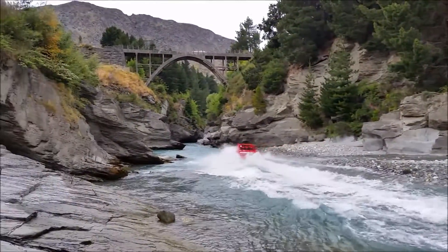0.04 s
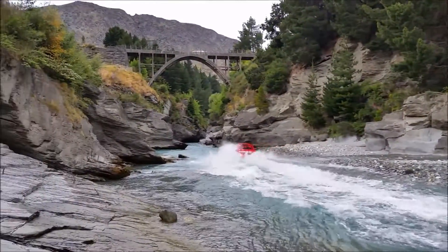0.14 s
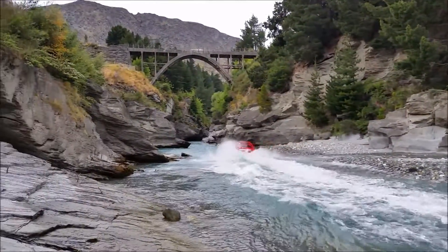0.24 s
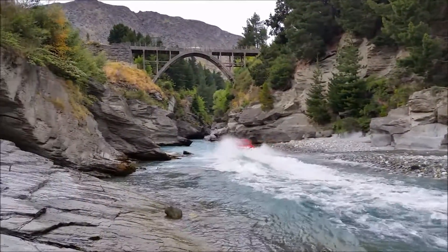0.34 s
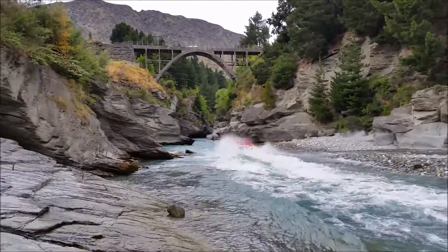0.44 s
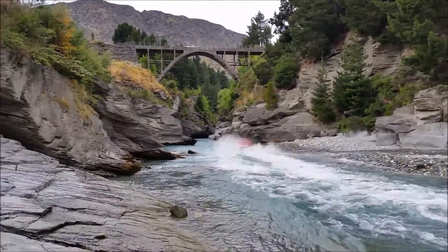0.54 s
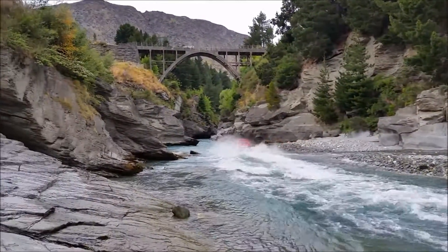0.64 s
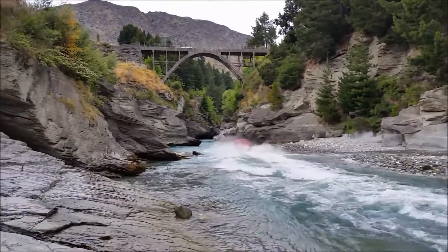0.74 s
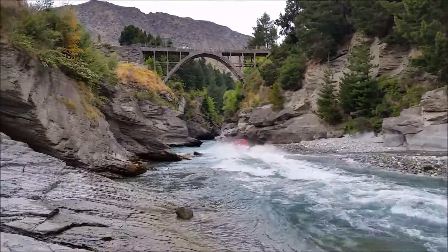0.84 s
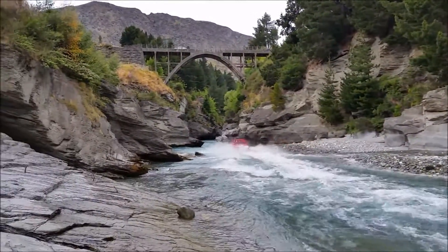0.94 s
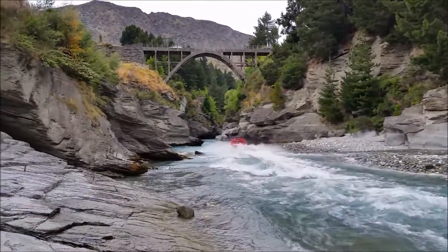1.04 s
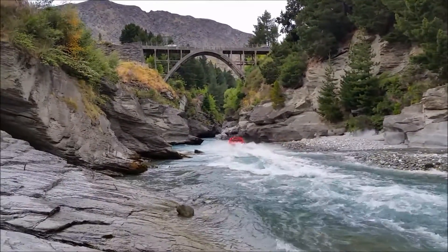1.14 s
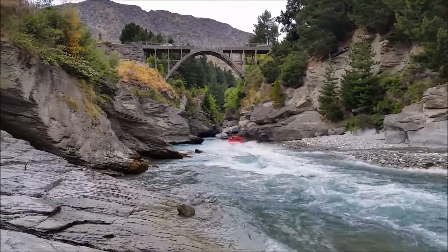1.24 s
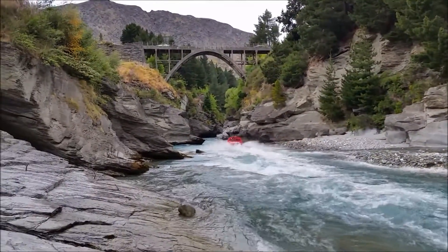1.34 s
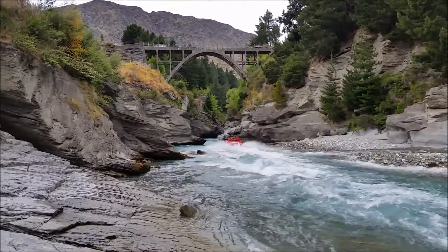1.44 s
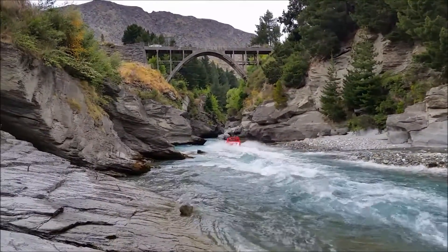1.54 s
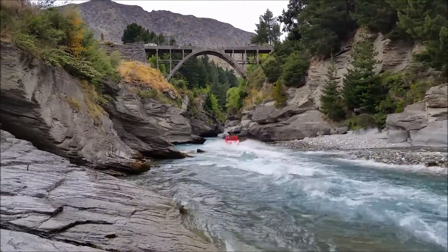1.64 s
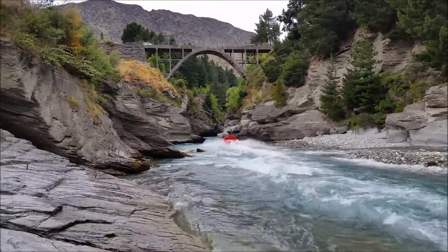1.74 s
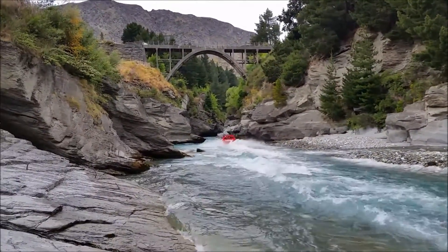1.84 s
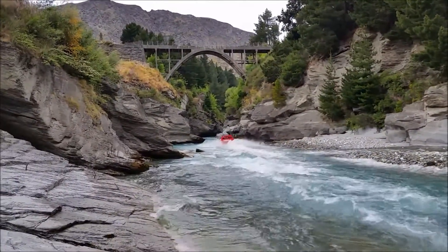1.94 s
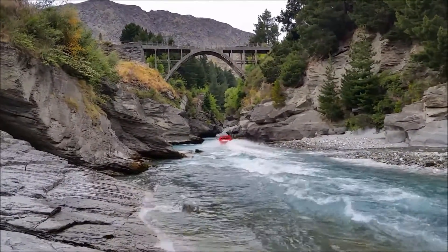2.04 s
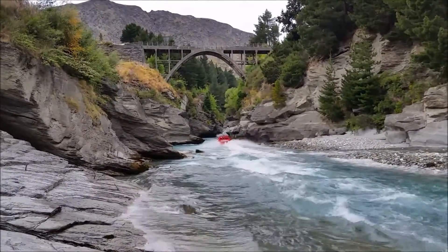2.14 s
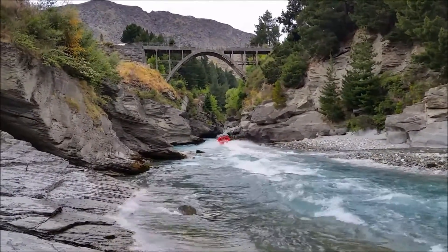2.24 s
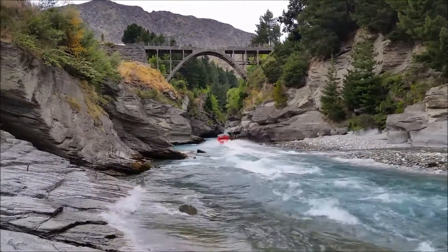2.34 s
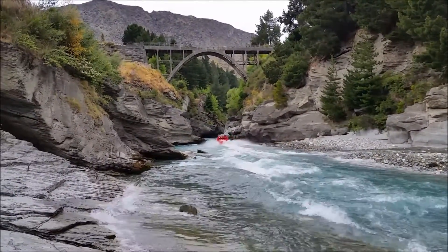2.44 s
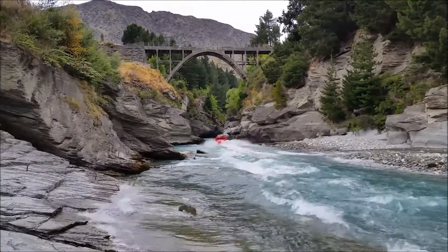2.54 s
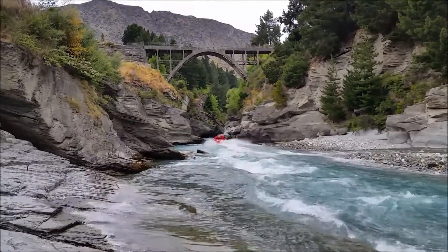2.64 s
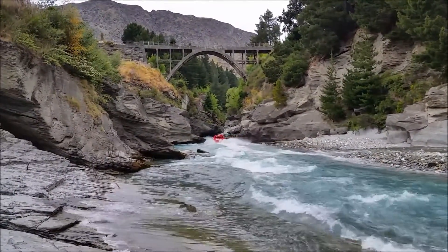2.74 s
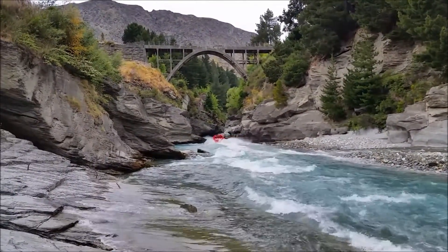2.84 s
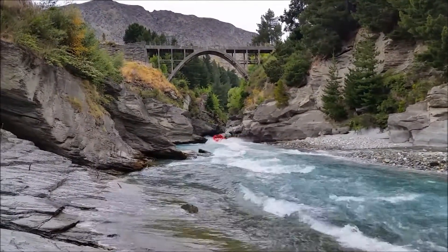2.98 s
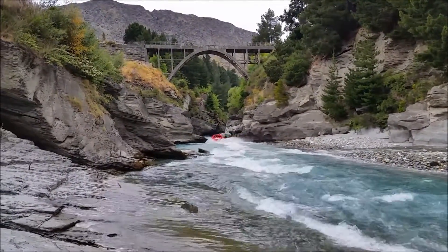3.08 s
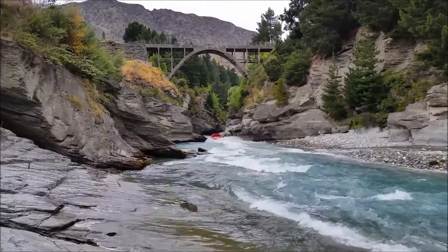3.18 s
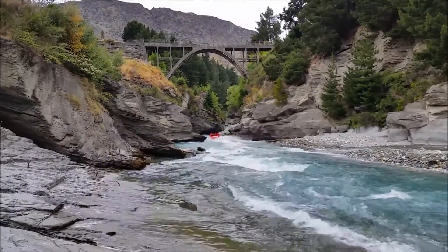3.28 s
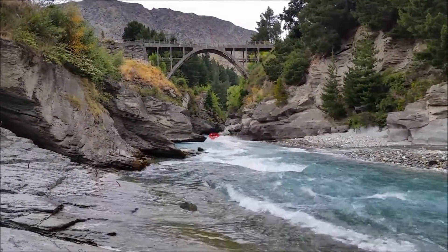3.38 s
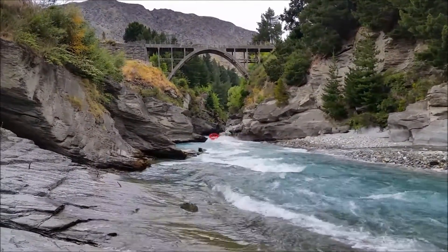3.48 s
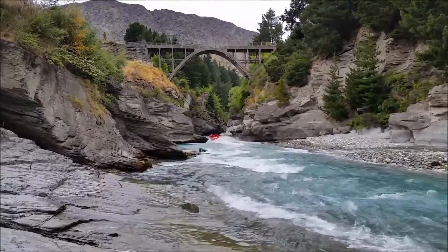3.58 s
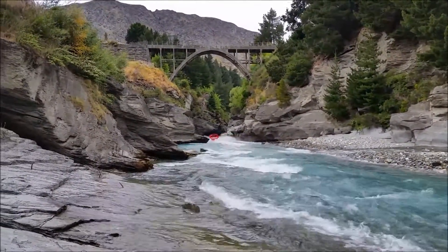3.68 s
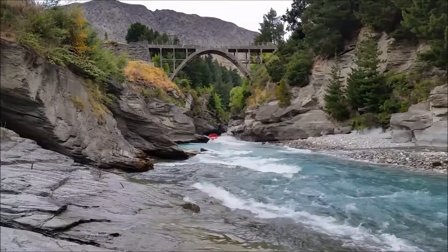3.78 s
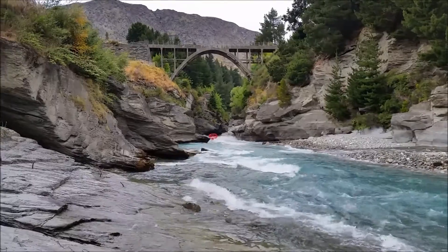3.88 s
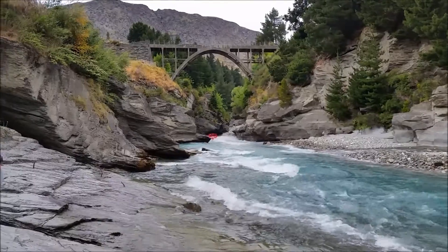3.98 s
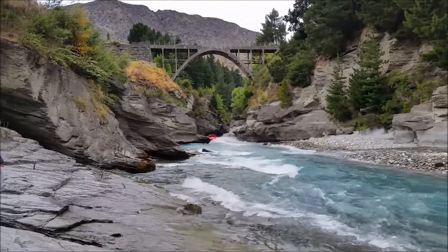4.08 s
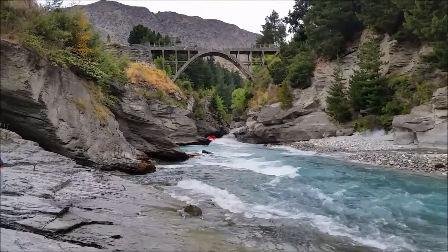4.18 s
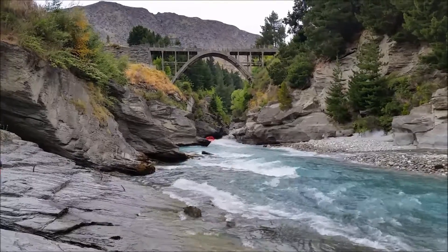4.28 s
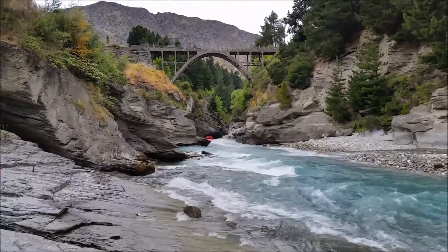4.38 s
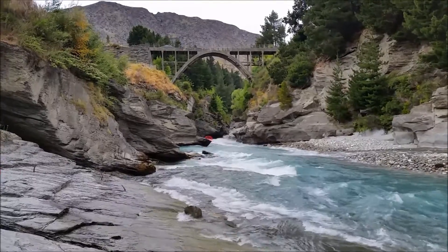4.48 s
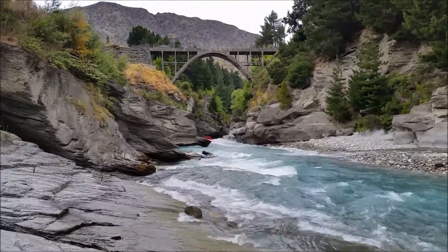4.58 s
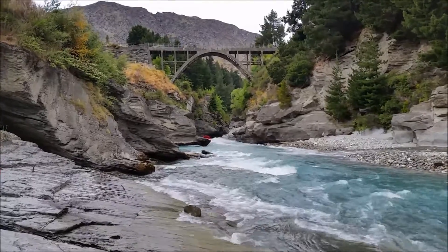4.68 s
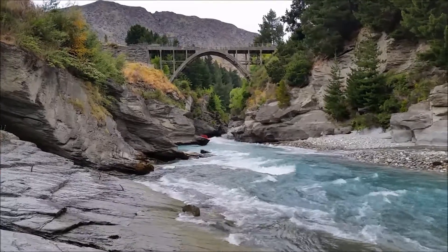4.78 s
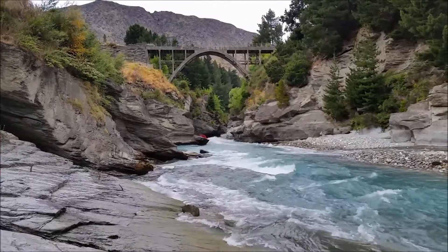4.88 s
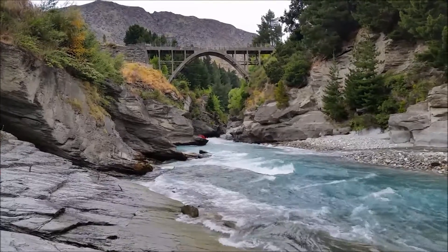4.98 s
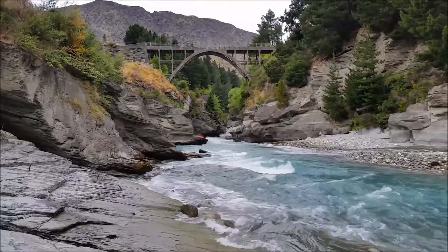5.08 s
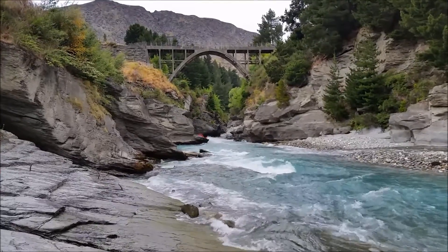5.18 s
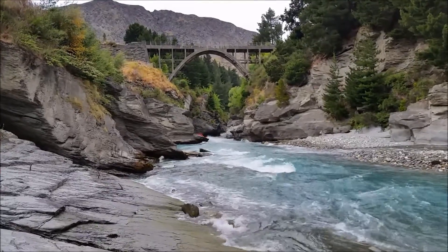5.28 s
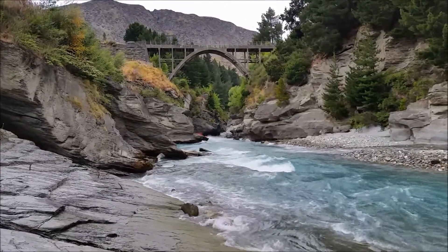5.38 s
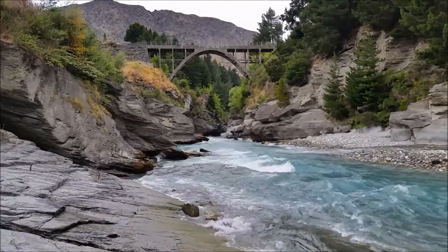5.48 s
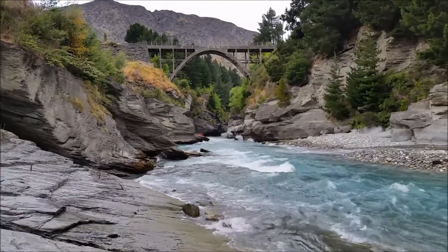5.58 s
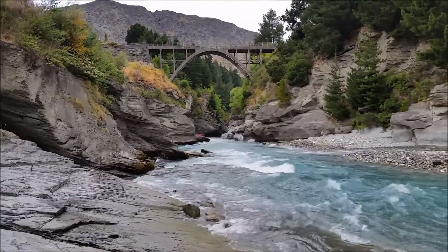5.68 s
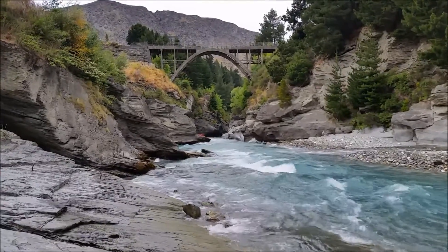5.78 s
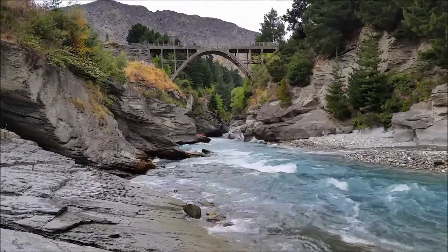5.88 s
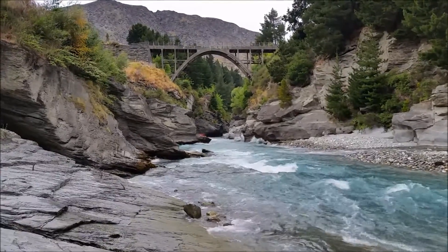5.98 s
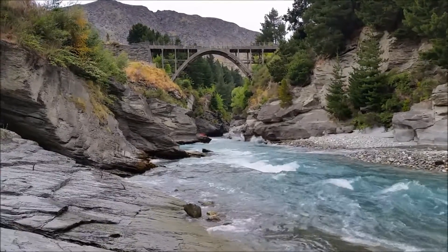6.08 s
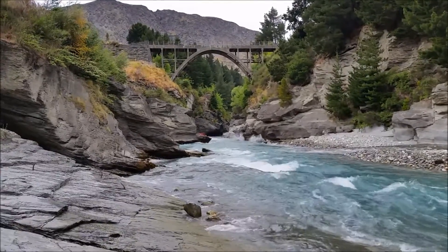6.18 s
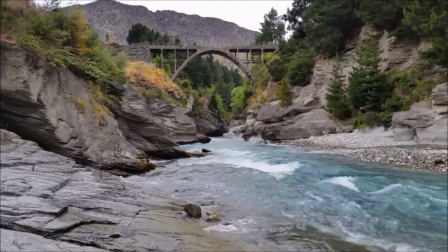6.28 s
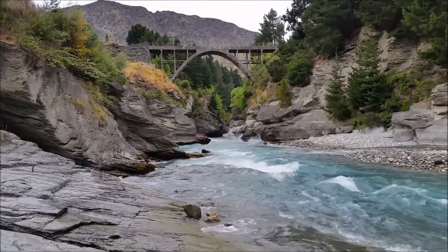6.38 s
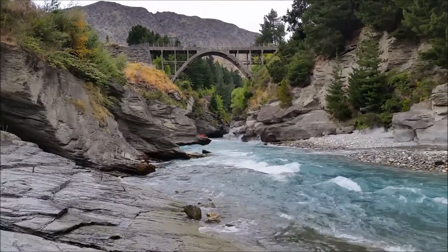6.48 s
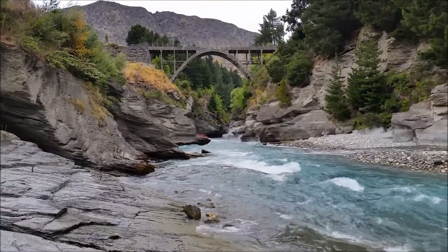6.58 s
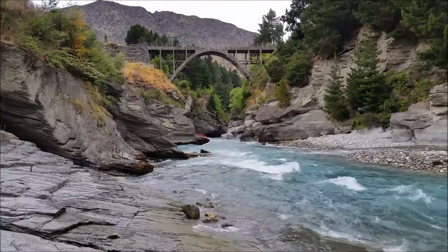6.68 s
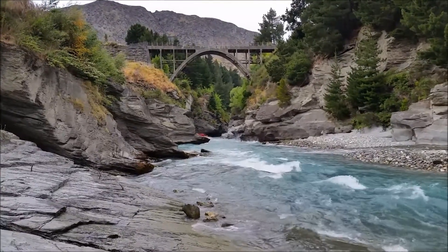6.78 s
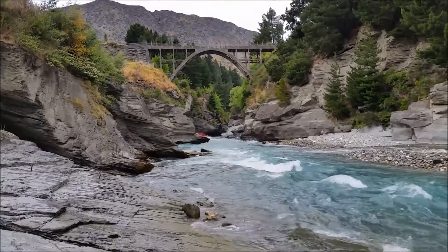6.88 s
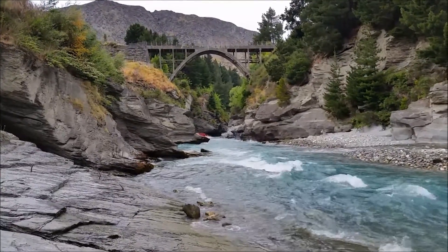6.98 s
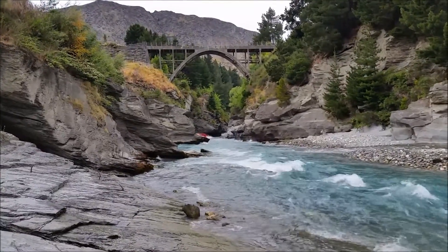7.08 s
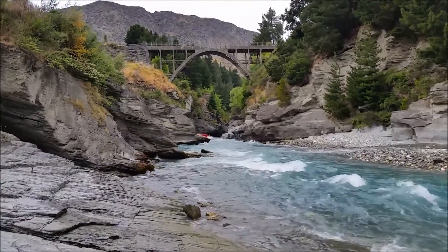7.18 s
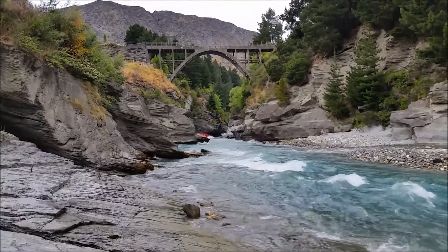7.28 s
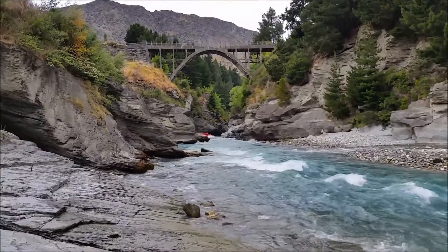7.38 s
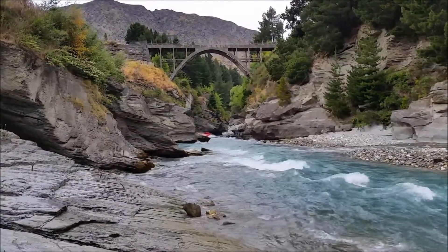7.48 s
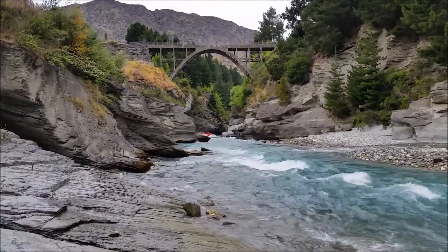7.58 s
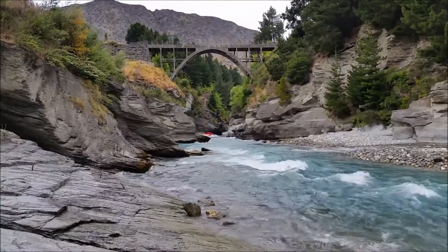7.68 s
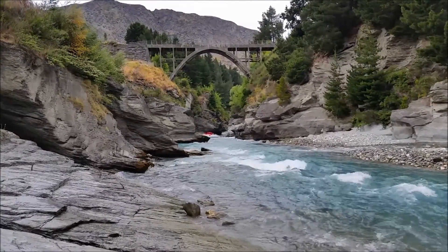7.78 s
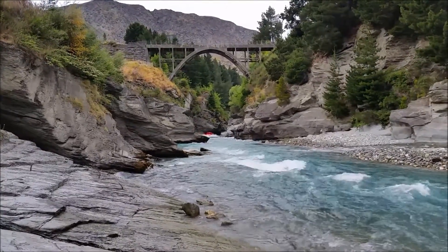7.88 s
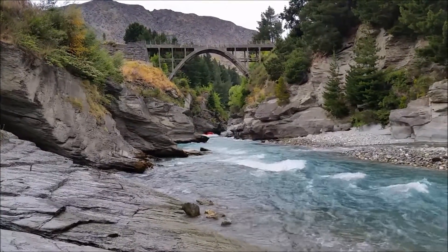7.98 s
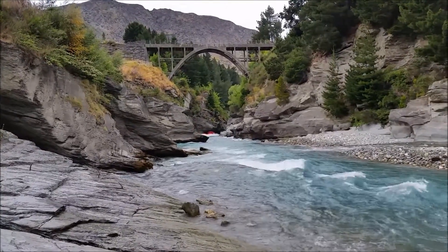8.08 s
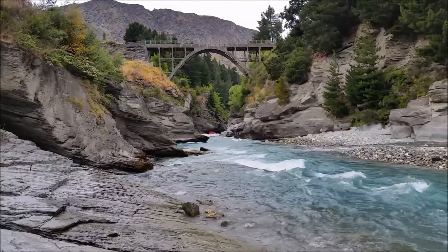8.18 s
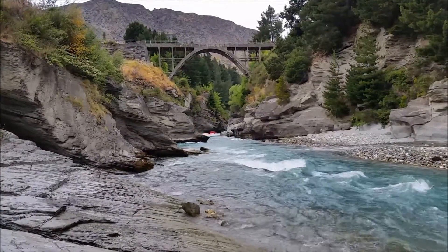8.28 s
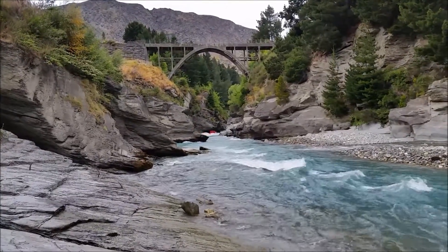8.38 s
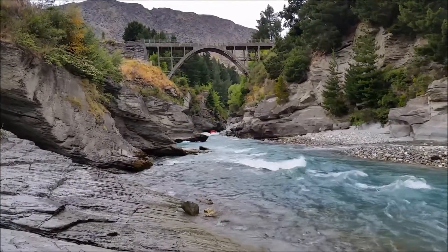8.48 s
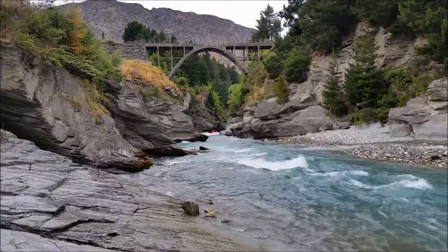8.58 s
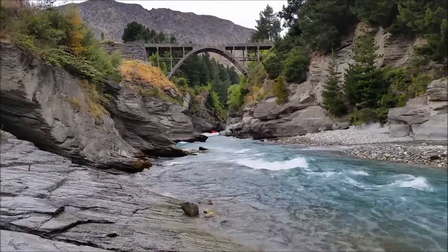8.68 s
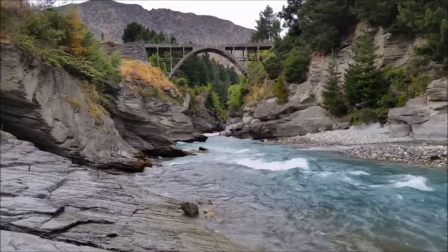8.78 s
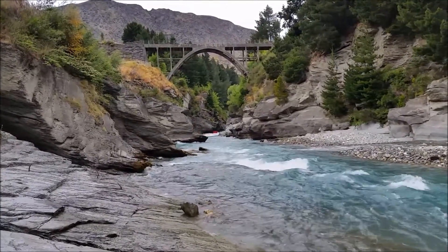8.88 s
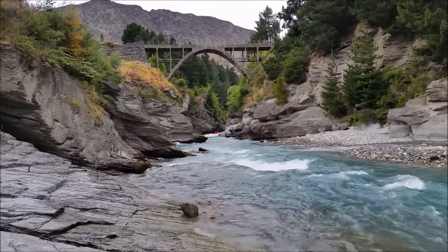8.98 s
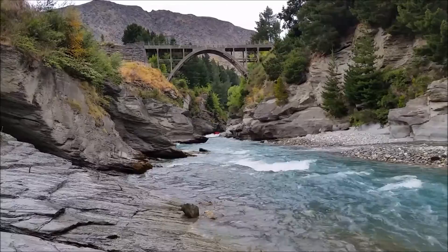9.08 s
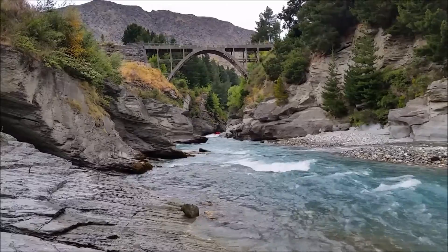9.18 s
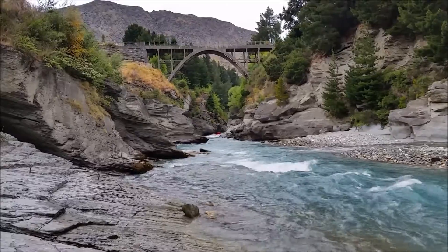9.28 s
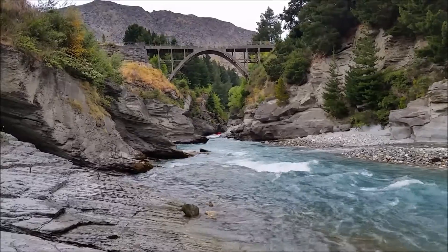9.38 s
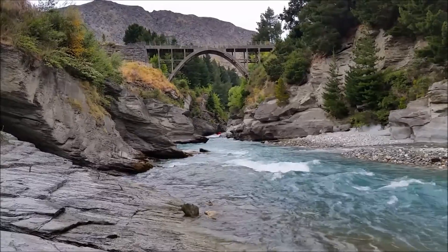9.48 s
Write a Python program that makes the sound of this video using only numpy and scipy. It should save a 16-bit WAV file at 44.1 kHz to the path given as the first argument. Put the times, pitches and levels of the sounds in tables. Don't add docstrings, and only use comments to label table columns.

```python
import sys
import numpy as np
from scipy import signal
from scipy.fft import rfft, irfft, next_fast_len
from scipy.io import wavfile
from scipy.ndimage import uniform_filter1d

SR = 44100
rng = np.random.default_rng(int(sys.argv[2]) if len(sys.argv) > 2 else 0)


def magnitude_from_level(level_db):
    exponent = np.asarray(level_db, float) / 20
    return 10 ** exponent


def store_wav(level_fs):
    pcm = np.round(np.clip(np.atleast_2d(level_fs), -1, 1) * 32767)
    wavfile.write(sys.argv[1], SR, pcm.T.astype(np.int16))


N = 420273
TIME = np.arange(N) / SR
SIZE = next_fast_len(N)
FREQ = np.maximum(np.arange(SIZE // 2 + 1) * SR / SIZE, 1)
STEP = 20
BASS_SR = SR / STEP
BASS_TIME = TIME[::STEP]


def unit(x):
    return x / np.sqrt(np.mean(np.abs(x) ** 2))


def columns(table, time):
    s, *rest = np.transpose(table)
    return [np.interp(time, s, column) for column in rest]


def over_hz(table, freq, count=1):
    rows = np.array(table)
    return np.interp(np.log(freq), np.log(rows[:, 0]), rows[:, count])


def coloured(x, table):
    length = x.shape[-1]
    freq = np.linspace(1, BASS_SR / 2, length // 2 + 1)
    return unit(irfft(rfft(x) * magnitude_from_level(over_hz(table, freq)), length))


def walk(rate, time, count=1):
    levels = rng.standard_normal((count, 4000))
    place = time * rate
    k = place.astype(int)
    ease = (1 - np.cos(np.pi * (place - k))) / 2
    return (levels[:, k] * (1 - ease) + levels[:, k + 1] * ease) * np.sqrt(4 / 3)


def swells(table):
    s, half, *rest = np.transpose(table)
    bumps = np.exp(-((BASS_TIME[:, None] - s) / half) ** 2)
    return bumps, *rest


def pair(likeness, lag):
    shared, left, right = rfft(rng.standard_normal((3, SIZE)))
    c = np.clip(likeness, 0, 1)
    common, own = np.sqrt(c) * shared, np.sqrt(1 - c)
    return np.array([common * np.exp(-1j * lag) + own * left, common + own * right])


# freq_hz, level_db
WIND_COLOUR = [(15, -18), (40, -12), (70, -2), (120, 0), (200, -4.5), (300, -13.5), (500, -20),
               (900, -36.5)]
# start_s (centre), half_length_s, level_db
GUSTS = [(.3, 0.19, -14), (.75, 0.052, -9.5), (1.0, 0.23, -10.5), (1.58, 0.14, -20.5), (2.02, 0.1, -12.5),
         (2.25, .08, -8.5), (2.45, 0.057, -12), (2.82, 0.16, -6.5), (3.05, .12, -10.5), (3.55, 0.39, -16),
         (3.8, .1, -26), (4.0, 0.16, -9.5), (4.62, 0.09, -21), (4.88, 0.067, -31), (5.5, 0.26, -53),
         (6.7, 0.061, -27), (7.07, .1, -15), (7.63, 0.063, -26), (7.88, 0.062, -32), (8.13, .08, -32),
         (8.62, 0.06, -22), (8.88, .08, -21), (9.16, 0.099, -19)]
CALM_DB, CALM_DB_PER_S = -19.5, -3


def wind():
    air = coloured(rng.standard_normal((2, len(BASS_TIME))), WIND_COLOUR)
    air = air * magnitude_from_level(2.0 * walk(25, BASS_TIME, count=2))
    bumps, gust_db = swells(GUSTS)
    strength = bumps @ magnitude_from_level(gust_db) + magnitude_from_level(CALM_DB + CALM_DB_PER_S * BASS_TIME)
    return air * strength * magnitude_from_level([[-4.], [-11.]])


# freq_hz, level_db (per Hz)
LEFT_PORT = [(100, -53), (300, -56.5), (700, -57.5), (1000, -59.5), (1850, -61.5), (2500, -71),
             (4400, -73.5), (5000, -79.5), (7700, -74.5), (9300, -64), (11500, -74), (15700, -78)]
RIGHT_PORT = [(100, -60), (300, -61), (650, -58), (900, -66.5), (1800, -67), (2900, -76.5), (6700, -79.5),
              (8500, -90), (12500, -78), (14000, -69), (15200, -63.5), (15700, -62)]
# freq_hz, likeness (0-1), left_lag_rad
PORTS = [(300, .4, -.25), (650, .75, -.1), (1000, .45, 1.), (1290, .3, 2.2), (1550, .45, 2.9),
         (1800, .1, 4.2), (2200, .45, 5.5), (2800, .1, 6)]
SPRAY_SHARE = [0, .5, .75, 1.3, .9]
# start_s (centre), half_length_s, rush_swell_db, spray_swell_db
WAVES = [(.05, 0.069, -1, 2.5), (.38, 0.058, 3.5, 1), (.62, 0.086, 1, -0.5), (.98, 0.22, 2, 5),
         (1.33, 0.2, 2, 3.5), (1.9, 0.35, 4.5, 5), (2.53, 0.22, 4, 4.5), (2.85, 0.15, 1, 3),
         (3.28, 0.2, 1.5, 2.5), (4.08, 0.26, 0.8, 4.5), (4.5, .2, 2, 2.5), (4.83, .12, 2, 2),
         (5.2, 0.24, 1.5, 3.5), (5.55, 0.26, 1.5, 2), (5.98, 0.45, 1.5, 3), (6.93, 0.22, 0.5, 3),
         (7.28, 0.15, 1, 2.5), (7.68, .2, 0.5, 2.5), (8.2, .2, -0.4, 1), (8.8, .12, -0.3, 0),
         (9.2, 0.22, 0, 2.5)]
RUSH_DB, RUSH_DB_PER_S, SPRAY_DB, SPRAY_DB_PER_S = -3., 0.2226, 0.48, -0.63


def river():
    bumps, rush_swell_db, spray_swell_db = swells(WAVES)
    rush_db = RUSH_DB + RUSH_DB_PER_S * BASS_TIME + bumps @ rush_swell_db
    spray_db = SPRAY_DB + SPRAY_DB_PER_S * BASS_TIME + bumps @ spray_swell_db
    ports_db = np.array([over_hz(LEFT_PORT, FREQ), over_hz(RIGHT_PORT, FREQ)])
    water = pair(over_hz(PORTS, FREQ), over_hz(PORTS, FREQ, count=2))
    water = water * magnitude_from_level(ports_db) * np.sqrt(SR / 2)
    surge = walk(13, BASS_TIME)[0]
    splash = walk(260, BASS_TIME, count=2)
    heave = walk(7, BASS_TIME)[0]
    centres = np.log2([500, 2200, 7500, 10700, 15000])
    out = 0
    for k, treble in enumerate(np.linspace(0, 1, len(centres))):
        band = np.interp(np.log2(FREQ), centres, np.arange(len(centres)) == k)
        db = rush_db + SPRAY_SHARE[k] * (spray_db - rush_db) - 1.
        db = db + 1.27 * treble ** 0.45 * surge + 0.17 * heave
        db = db + 0.53 * treble * walk(25, BASS_TIME, count=2)
        db = db + 2.0 * treble ** 3 * splash
        gain = np.repeat(magnitude_from_level(db), STEP, axis=1)[:, :N]
        gain = uniform_filter1d(gain, STEP)
        out = out + irfft(water * band, SIZE)[:, :N] * gain
    return out


# start_s, peak_db, pitch_hz
DROP = [
    (7.639, -32, 4610),
]


def drop():
    out = np.zeros(N)
    for s, db, hz in DROP:
        swell = np.exp(-((TIME - s - .003) / 0.0019) ** 2)
        out += magnitude_from_level(db) * swell * np.sin(2 * np.pi * hz * TIME)
    return out * magnitude_from_level([[3], [-4]])


# start_s, level_db
ROAR = [(0, -21.5), (.8, -17), (1.2, -21), (2, -18), (3, -24.5), (4, -22), (4.8, -18), (5.5, -20),
        (6.2, -22), (7, -22), (7.6, -21.5), (8.5, -21), (9.53, -23.5)]
# freq_hz, level_db
ROAR_COLOUR = [(25, -29), (45, -25), (75, 2.5), (110, 0.5), (160, -3), (230, -5.5), (300, -12.5),
               (420, -33)]
ROAR_LIKENESS = .85


def roar():
    shared, left, right = rng.standard_normal((3, len(BASS_TIME)))
    own = np.array([left, right])
    noise = np.sqrt(ROAR_LIKENESS) * shared + np.sqrt(1 - ROAR_LIKENESS) * own
    return coloured(noise, ROAR_COLOUR) * magnitude_from_level(columns(ROAR, BASS_TIME)[0])


GORGE_T60_S, GORGE_DB = .9, -10


def gorge(x):
    t = BASS_TIME[:4000]
    shared, left, right = rng.standard_normal((3, len(t)))
    tail = shared + 0.5 * np.array([left, right])
    tail = tail * magnitude_from_level(-60 * t / GORGE_T60_S) * np.minimum(t / 0.015, 1)
    tail = tail / np.sqrt(np.sum(tail ** 2, axis=1, keepdims=True))
    echoes = signal.fftconvolve(x[None], tail, axes=1)[:, :len(x)]
    return x + magnitude_from_level(GORGE_DB) * echoes


def stack(hz, levels_db, jitter, flutter_db):
    wavering_hz = hz * (1 + jitter * walk(15, BASS_TIME)[0])
    turn = 2 * np.pi * np.cumsum(wavering_hz) / BASS_SR
    flutter = flutter_db * walk(13, BASS_TIME, count=len(levels_db))
    start = 2 * np.pi * rng.random(len(levels_db))
    out = 0
    for i, (k, db) in enumerate(levels_db):
        out = out + np.sqrt(2) * magnitude_from_level(db + flutter[i]) * np.sin(k * turn + start[i])
    return out


# freq_hz, width_hz, level_db
EXHAUST = [(105, 50, 0), (222, 40, 0), (297, 24, -5)]


def exhaust_db(hz):
    rings = sum(magnitude_from_level(2 * db) / (1 + (2 * (hz - f) / w) ** 2) for f, w, db in EXHAUST)
    return 10 * np.log10(rings / (1 + (72 / hz) ** 6))


HOWL_HZ, HOWL_WIDTH_HZ, HOWL_DB = 237, 21.4, 13


def howl_db(hz):
    return HOWL_DB / (1 + ((hz - HOWL_HZ) / HOWL_WIDTH_HZ) ** 4)


# start_s, cycle_hz
ENGINE = [(0, 26.3), (.62, 28.9), (1.22, 25.0), (1.6, 25.5), (2.0, 23.5), (2.42, 24.8), (3.12, 20.7),
          (3.9, 20.3), (4.72, 17.0), (5.18, 30.2), (5.78, 32.2), (6.03, 20.6), (6.58, 16), (7.0, 31.5),
          (7.55, 22.1), (8.1, 27.2), (8.96, 31.1), (9.34, 22.6)]
# start_s, cycle_hz, level_db
TWIN = [(0, 27, -23), (1.1, 27.7, -30), (1.55, 25.8, -32), (2.1, 29, -30), (3, 19.1, -24.5),
        (3.6, 16.8, -25.5), (4.3, 21.3, -24.5), (4.8, 18.9, -26), (5.1, 17, -35), (5.7, 18.6, -28.5),
        (6.1, 20.7, -29), (6.6, 16.5, -26.5), (6.8, 21.2, -21), (7, 19.4, -20.5), (7.25, 20.5, -21.5),
        (7.6, 19.5, -40), (8.5, 29.2, -26.5), (9.53, 29, -34)]
# multiple (of the cycle), level_db
ORDERS_DB = [(2, -8), (3, 0), (4, -9), (5, 5), (6, -11), (7, -11), (8, -3), (9, 0), (11, 1), (13, -8)]
# multiple, cruise_db, slope_db (per octave of speed), view_share, closed_throttle_db
STRONG = [(2, -32, 36, .6, -6), (3, -21, 44, .7, -9), (5, -26.5, -7, -.5, 3), (8, -26, 2, .9, 8),
          (13, -47, -18, .7, 17)]
# start_s, effort_db, view_db (clear view, lost once it rounds the rocks)
LOAD = [(0, 1, -35), (.2, 2, -32), (.7, 1, -31), (1.3, -4, -29.5), (1.8, 2, -30), (2.6, 0, -28),
        (3.4, -1, -27.5), (4.0, 1, -32.5), (4.6, -1, -26), (5.1, -3.5, -38.5), (5.7, -6.5, -48),
        (6.3, -12, -38), (6.7, -6.5, -44), (7.05, -8, -42), (7.65, 3, -38), (8.4, -3, -36.5),
        (9.0, -1.5, -38), (9.3, 3.5, -35.5)]
CRUISE_HZ, VIEW_DB = 25, -30
FULL_HZ = 28.5
INERTIA_S = .1
COAST_HZ_PER_S = 16
LINGER_S = .25


def engines():
    hz, = columns(ENGINE, BASS_TIME)
    effort_db, view_db = columns(LOAD, BASS_TIME)
    hz = uniform_filter1d(hz, round(INERTIA_S * BASS_SR))
    coast = np.clip(-np.gradient(hz) * BASS_SR / COAST_HZ_PER_S, 0, 1)
    keep = np.exp(-1 / (LINGER_S * BASS_SR))
    coast = signal.lfilter([1 - keep], [1, -keep], coast)

    octaves = np.log2(np.minimum(hz, FULL_HZ) / CRUISE_HZ)
    strong = {}
    for k, cruise_db, slope_db, share, closed_db in STRONG:
        db = cruise_db + slope_db * octaves + effort_db
        db = db + share * (view_db - VIEW_DB) + closed_db * coast
        if k > 10:
            db = db + howl_db(k * hz)
        strong[k] = db
    first = [(k, strong.get(k, view_db + db + exhaust_db(k * hz))) for k, db in ORDERS_DB]

    twin_hz, twin_db = columns(TWIN, BASS_TIME)
    dulling_db = (view_db + 19) / 9
    second = [(k, twin_db + db + exhaust_db(k * twin_hz) + (k - 5) * dulling_db) for k, db in ORDERS_DB]
    return (stack(hz, first, jitter=.004, flutter_db=1.9)
            + stack(twin_hz, second, jitter=0.01083, flutter_db=1.0))


BOAT_LAG = 10


def scene():
    boat = (gorge(engines()) + roar()) * magnitude_from_level([[-.3], [.3]])
    bass = signal.resample_poly(np.vstack([boat, wind()]), STEP, 1, axis=1)[:, :N]
    left, right, *gusts = bass
    return np.array([left, np.roll(right, BOAT_LAG)]) + gusts + river() + drop()


def low_pass(x):
    return signal.sosfilt(signal.butter(12, 17080, fs=SR, output="sos"), x)


def record(dry):
    ceiling, top_hz = .98, 15750
    soft = ceiling * np.tanh(dry / ceiling)
    cut = irfft(rfft(soft, SIZE) * (FREQ < top_hz), SIZE)[:, :N]
    return low_pass(cut)


dry = scene()
out = record(dry)
store_wav(out)
```